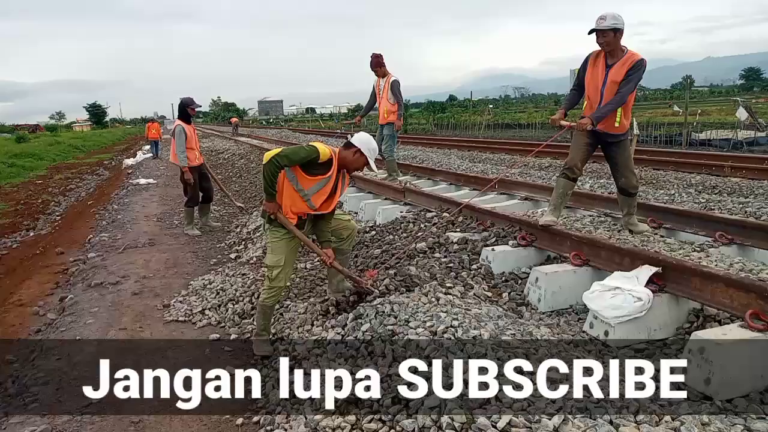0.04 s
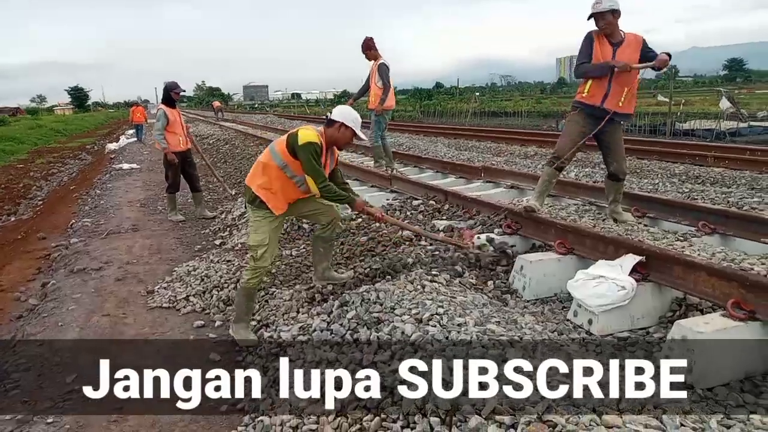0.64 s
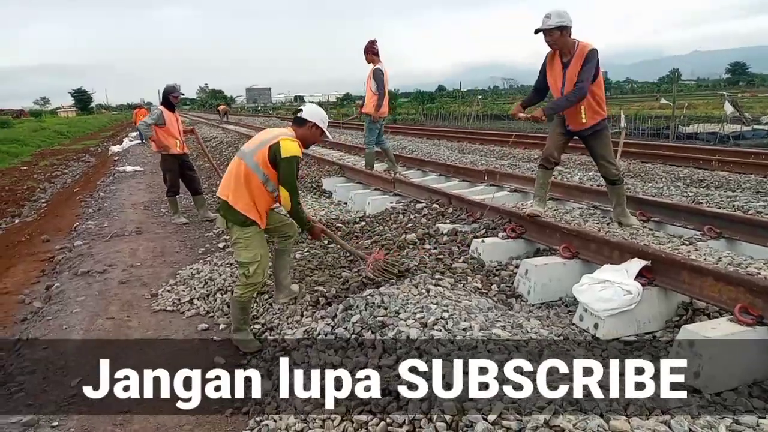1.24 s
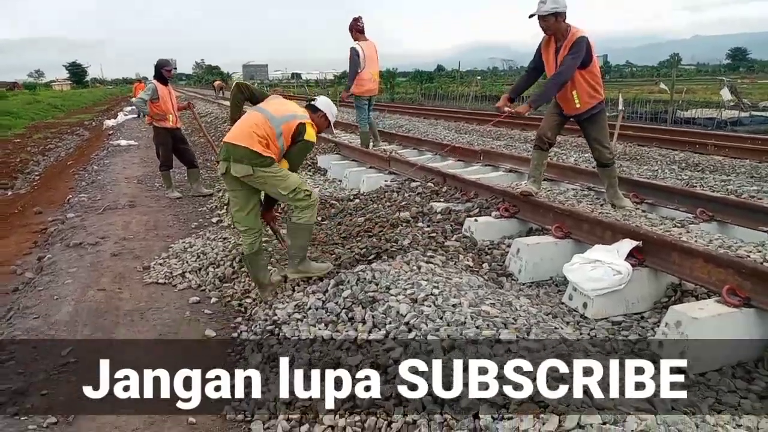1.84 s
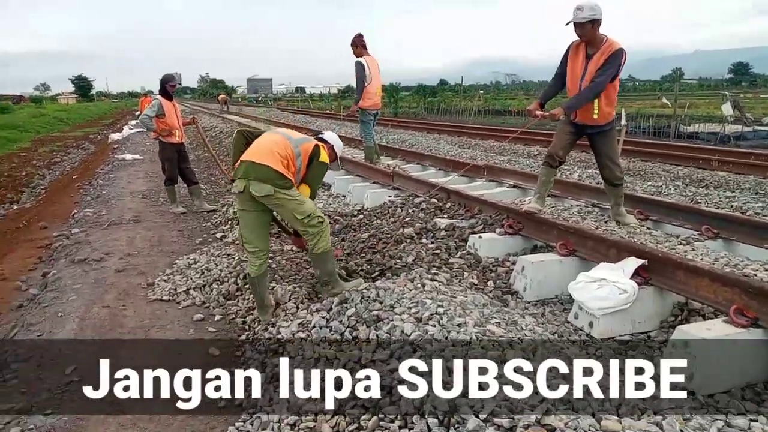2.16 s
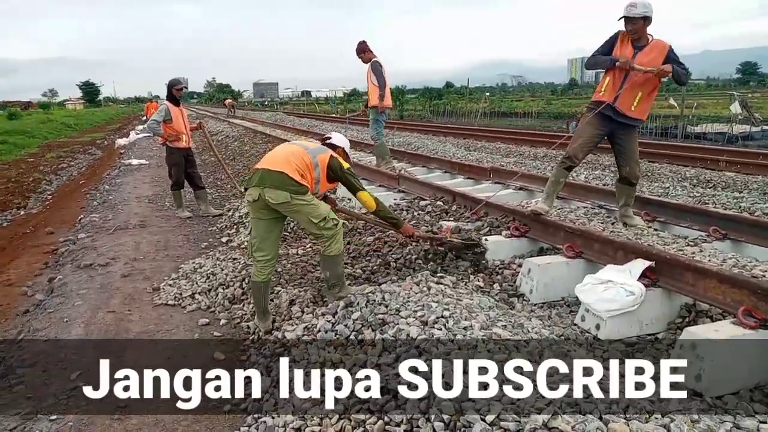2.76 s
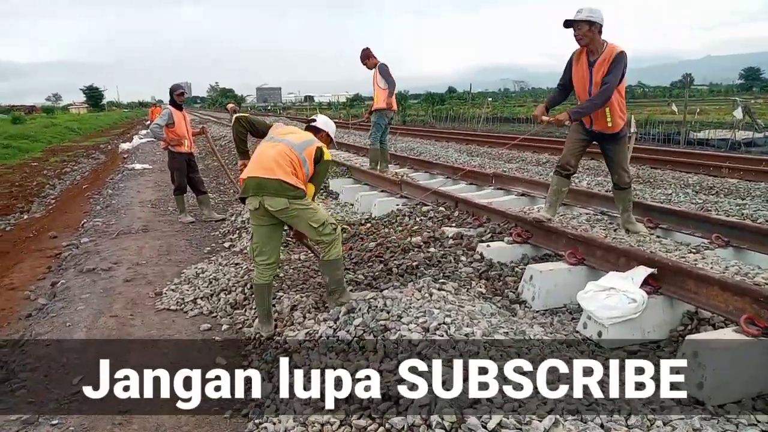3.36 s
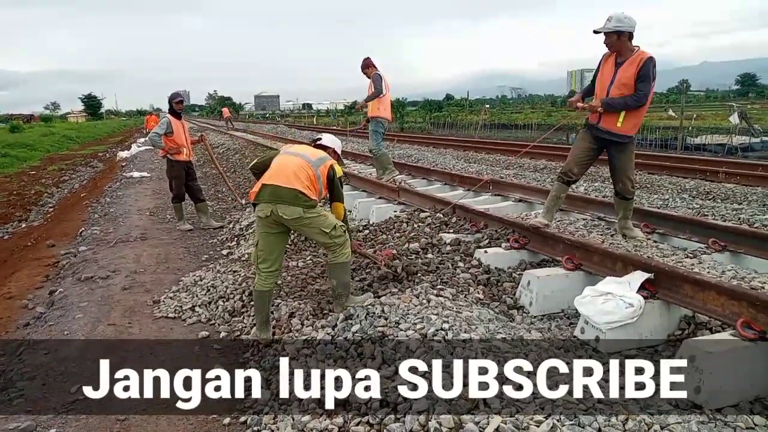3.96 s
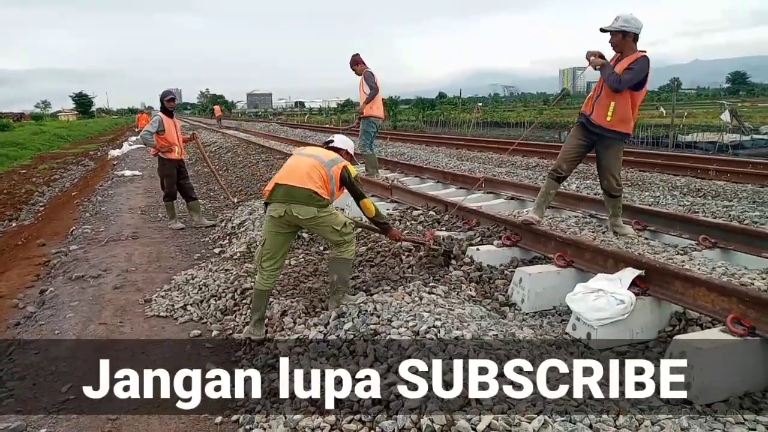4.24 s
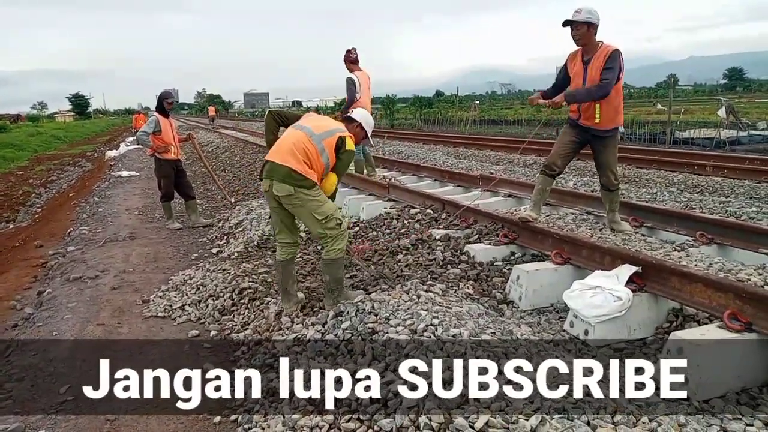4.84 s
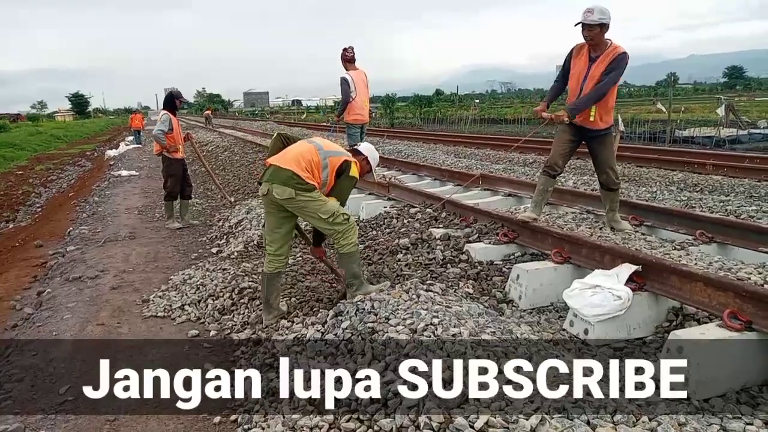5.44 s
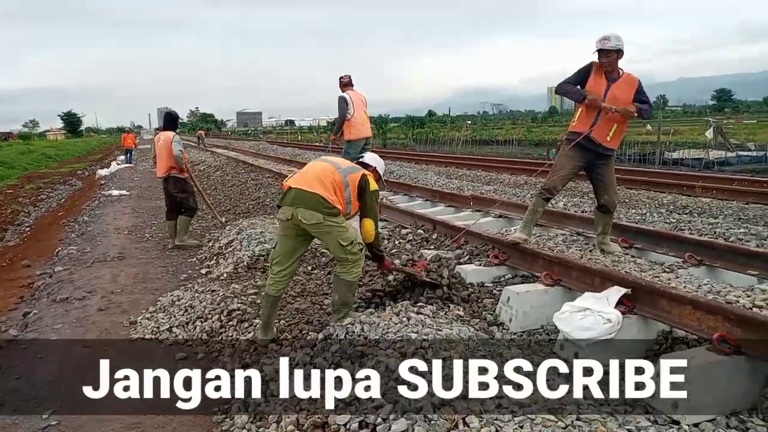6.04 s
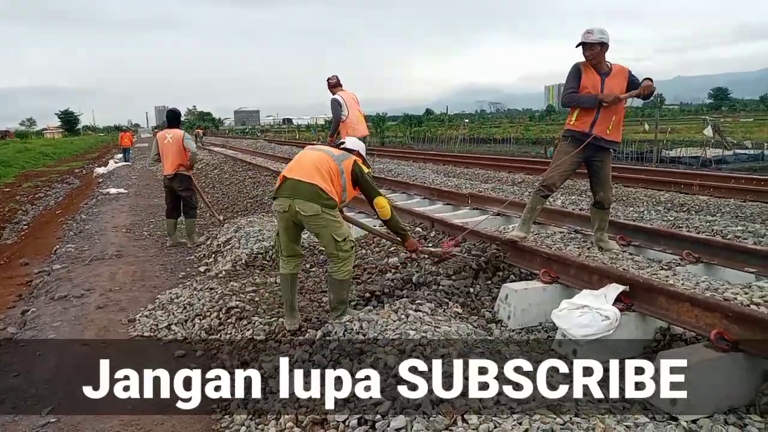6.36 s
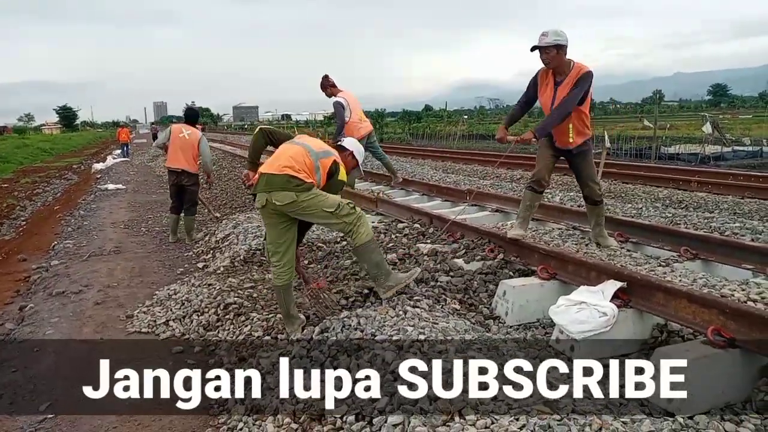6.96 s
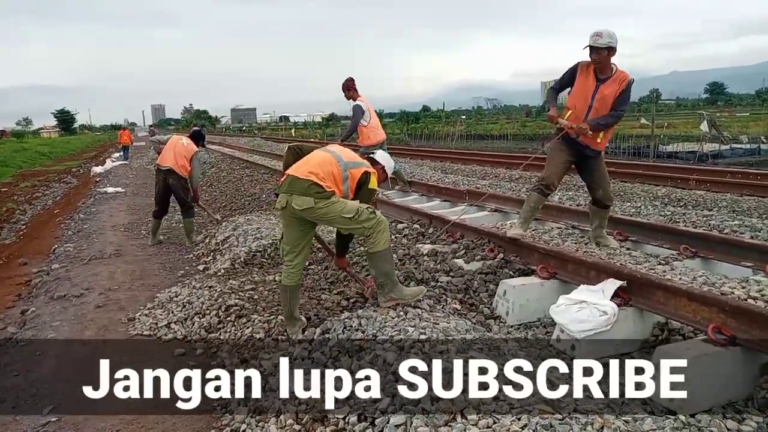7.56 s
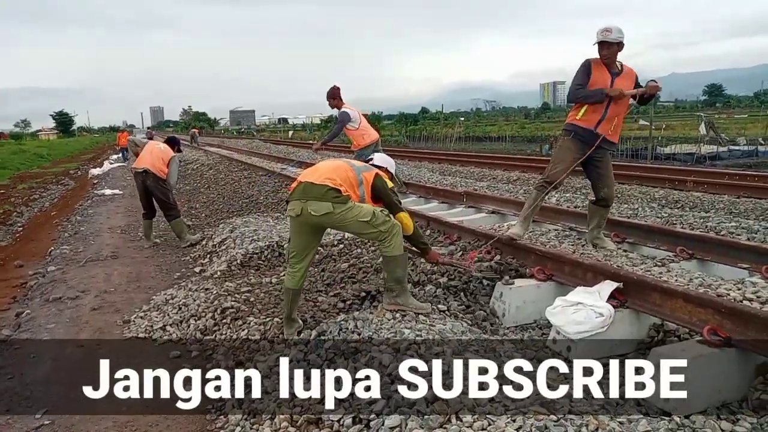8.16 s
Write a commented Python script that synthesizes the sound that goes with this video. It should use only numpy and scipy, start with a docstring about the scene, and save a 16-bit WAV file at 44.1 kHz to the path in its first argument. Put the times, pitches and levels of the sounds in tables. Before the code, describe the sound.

Gravel being shovelled outdoors, grinding and crunching in repeated scrapes, with small metallic pings and a faint wind rumble.

```python
"""Shovelling track ballast

A worker shovels crushed stone beside a railway track, in five long scraping strokes.
Stones grind and click together and ring the steel blade, more freely as it lifts and reaches out.
A low motor-like hum lasts for the first seconds; light wind and soft bumps reach two microphone ports."""
import sys
import numpy as np
from scipy import signal
from scipy.fft import rfft, irfft
from scipy.io import wavfile
from scipy.ndimage import uniform_filter1d, map_coordinates

SR = 44100
rng = np.random.default_rng(int(sys.argv[2]) if len(sys.argv) > 2 else 0)


def unload_wav(signal):
    """Save mono or channel-first audio to the path in sys.argv[1] as 16-bit WAV at rate SR, clipped to [-1, 1]."""
    wavfile.write(
        sys.argv[1],
        SR,
        np.round(np.clip(np.atleast_2d(signal).T, -1, 1) * 32767).astype(np.int16),
    )


N = 362061

# modes of the steel blade, before damping is applied: pitch_hz, level_db, t60_s
BLADE_MODES = [(1803, -5, .07), (2250, 0, .03), (2420, -2, .03), (3810, -7, .025), (4930, -2, .025),
               (5560, 2, .034), (6300, -1, .018), (10400, -12, .02)]


def scraping():
    """The blade pushes through the heap: stones crush and clink in jolts, and the steel rings along."""
    level_db, coarse_db, grit_db = stroke_levels()
    reach = blade_reach()
    crush = unit(collisions(count=14000, spread_db=-2.5, cycles=1.67, size=130) + rng.standard_normal(N))
    clinks = collisions(count=3000, spread_db=2.5, cycles=7, size=380)
    sliding = unit((crush + amp(-4) * clinks) * jolts(count=4000, spread_db=-1.4, t60_s=.036))
    # between strokes only a few pebbles still settle
    ticks = unit(crush * jolts(count=300, spread_db=2, t60_s=.025))
    calm = np.clip((-35 - level_db) / 14, 0, .65)
    contacts = (1 - calm) * sliding + calm * ticks
    stones = stone_colour(contacts)
    # the load chokes the blade; held out, it rings more
    choked_ring = blade_ring(np.arange(SR // 16) / SR, damping=3)
    steel = unit(signal.oaconvolve(contacts, choked_ring[None], axes=1)[:, :N])
    steel_share = .04 + .11 * reach ** 2
    body = np.sqrt(1 - steel_share) * unit(band(stones, 1300, 7200)) + np.sqrt(steel_share) * steel
    # stones slide off the outstretched blade: less weight, more rasp
    shed_db, rasp_db = 4.5, -6
    coarse = amp(coarse_db + 3 - shed_db * reach) * unit(band(stones, 354, 1190))
    skids = stone_colour(crush) * jolts(count=1500, spread_db=2, t60_s=.04)
    rasp = amp(rasp_db) * reach ** 2 * unit(band(skids, 4300, 6800))
    # fine grit comes in spurts, with the high notes of small chips
    spurts = jolts(count=300, spread_db=8, t60_s=.05)
    chips = collisions(count=700, spread_db=3, cycles=22, size=500, modes=2)
    grit = unit(band(stones, 8270, 14500) * (1 + .43 * spurts)) + .5 * unit(band(chips, 7900, 17300))
    return amp(level_db) * (body + coarse + rasp + amp(grit_db + 10) * unit(grit))


def stroke_levels():
    """Scrapes rise, swell or sag with the load and run out: overall dB, coarse and grit relative to it."""
    # long pushes and light drags of the blade, and a soft shuffle of boots on gravel:
    # start_s, end_s, attack_s, level_db, swell_db_per_s, release_t60_s, coarse_db, grit_db
    scrapes = [(0.37, .6, 0.039, -37, -8, .3, -38, -13.5), (0.463, 0.835, 0.14, -27, 2.5, 1, -13, -11.5),
               (0.96, 0.974, 0.007, -26.5, 3, 0.75, -7.5, -8.5),
               (1.09, 1.283, 0.074, -28, 9.5, 0.35, -14, -9.5), (1.348, 1.877, 0.021, -43, 0, 1, -6.5, -12),
               (1.878, 2.551, 0.059, -26, 5.5, 0.25, -12.5, -11),
               (2.504, 3.017, 0.065, -23, -12.5, 1, -14, -10),
               (3.618, 4.136, 0.079, -21, -6.5, 0.43, -15.5, -7),
               (4.182, 4.585, 0.019, -27, -9, 0.61, -11.5, -12.5),
               (4.695, 4.953, 0.017, -34, -19, 1, -5, -14), (5.108, 5.29, 0.038, -38.5, 9, .3, -9, -11),
               (5.296, 6.086, 0.0084, -26, 3.5, 0.84, -11, -11),
               (6.147, 6.497, 0.02, -27, 5, 0.44, -12.5, -11),
               (6.523, 6.659, 0.011, -33.5, -9, 0.082, -2, -11),
               (6.676, 6.832, 0.017, -42, -14, 0.24, -2, -21),
               (7.025, 7.07, 0.017, -28.5, 2, 0.13, -11, -14),
               (7.191, 7.357, 0.025, -25.5, 9.5, 0.4, -13, -11),
               (7.432, 7.715, .02, -27.5, 13.5, 0.3, -7.5, -11),
               (7.71, 8.21, 0.016, -22.5, -12, .4, -15.5, -10.5)]
    t, power = np.arange(N) / SR, np.zeros((3, N))
    for start_s, end_s, attack_s, level_db, swell, t60_s, coarse_db, grit_db in scrapes:
        age = t[:int((end_s - start_s + t60_s) * SR)]
        held = np.minimum(age, end_s - start_s)
        envelope = (1 - np.exp(-age / attack_s)) * amp(level_db + swell * held - 60 * (age - held) / t60_s)
        add(power, start_s, (amp([[0], [coarse_db], [grit_db]]) * envelope) ** 2)
    settling_db = -49  # pebbles that never quite come to rest
    power += (amp([[0], [-5], [-18]]) * amp(settling_db)) ** 2
    whole, coarse, grit = 10 * np.log10(power)
    return whole, coarse - whole, grit - whole


def blade_reach():
    """A slow push out and a quick pull back: 0 is at the feet, 1 at the rail."""
    # swings of the shovel: fully_out_s, pull_start_s
    swings = [(.7, 1.07), (3.0, 3.1), (4.5, 4.6), (6.3, 6.8), (8.1, 7.95)]
    push_s, pull_s, nearest = 1.0, .26, .21
    t = np.arange(N) / SR
    arcs = [np.minimum(1 + (t - out) / push_s, 1 - (t - back) / pull_s) for out, back in swings]
    return np.clip(np.max(arcs, axis=0), nearest, 1)


def collisions(count, spread_db, cycles, size=220, modes=3):
    """Stones collide at random: stereo grains of size samples, each mode decaying over so many cycles."""
    start = rng.integers(0, N, (count, 1))
    force = amp(spread_db * np.minimum(rng.exponential(size=(count, 1)), 3))
    skew_s = rng.normal(0, 1.5e-5, (count, 1))  # each grain has its own direction
    t = np.maximum(np.arange(size) / SR + np.array([skew_s, -skew_s]), 0).astype(np.float32)
    hz = np.exp(rng.uniform(np.log(600), np.log(17000), (modes, count, 1))).astype(np.float32)[:, None]
    age = hz * t / float(cycles)
    grains = (hz * np.sin(2 * np.pi * hz * t) * np.sqrt(age) * np.exp(-age)).sum(0)
    grains *= force * np.linspace(1, 0, size)
    positions = (start + np.arange(size)).ravel()
    return unit(np.array([np.bincount(positions, side.ravel(), N)[:N] for side in grains]))


def jolts(count, spread_db, t60_s):
    """Envelope of a heap giving way: slips that build over a few milliseconds and die quickly."""
    start = rng.integers(0, N, count)
    force = amp(spread_db * np.minimum(rng.exponential(size=count), 3))
    slips = uniform_filter1d(np.bincount(start, force ** 2, N), size=150)
    power = signal.lfilter([1], [1, -amp(-60 / (t60_s * SR)) ** 2], slips)
    return unit(np.sqrt(np.abs(power)))


def stone_colour(x):
    """Give white clicks the tone of stone on stone."""
    # spectrum of colliding stones: frequency_hz, gain_db
    gravel_eq = [(100, -76), (250, -4.5), (450, -15.5), (800, -9), (1200, -6.5), (2000, 0), (3500, -1),
                 (5900, -3.5), (8000, -1.5), (12000, -2.5), (16000, 5)]
    return equalise(x, gravel_eq)


def blade_ring(t, damping, struck_hz=None):
    """The steel's modes ring at new strengths with each blow; a point blow favours the one at struck_hz."""
    ring = 0
    for pitch_hz, level_db, t60_s in BLADE_MODES:
        miss_db = 0 if struck_hz in (None, pitch_hz) else 13
        envelope = amp(level_db + rng.normal(0, 1) - miss_db - 60 * damping * t / t60_s)
        ring += envelope * np.sin(2 * np.pi * pitch_hz * t + rng.uniform(0, 2 * np.pi))
    return ring


def knocks_and_ticks():
    """Stone knocks and high ticks: each is a brief chatter around its own short note."""
    # hits, from low stone knocks to thin, very high ticks: start_s, level_db, pitch_hz
    hits = [(0.4685, -23, 5330), (0.6298, -4.5, 11800), (.6474, -12, 6030), (.6914, -12.5, 2290),
            (.7367, -10.5, 4770), (0.7882, -16, 2430), (0.9758, -12, 4150), (1.1673, -13, 4210),
            (1.2186, -18.5, 2530), (1.694, -22.5, 2740), (1.8155, -23, 2180), (2.2876, -4, 10800),
            (2.9407, -11, 6000), (2.9726, -17.5, 2580), (3.0018, -10, 4900), (3.042, -5, 11900),
            (3.1254, -16.5, 2440), (3.1747, -16.5, 2390), (3.275, -26.5, 2320), (3.311, -27, 4640),
            (3.387, -28, 2980), (3.6356, -8, 3610), (3.6721, -7, 5300), (4.1619, -9, 4210),
            (4.446, -9.5, 5530), (4.474, -5, 11700), (4.5509, -12.5, 3860), (4.5819, -13.5, 2400),
            (4.596, -1.5, 11360), (4.6094, -15, 5700), (4.7326, -14, 2490), (5.1962, -21, 3620),
            (5.5917, -8.5, 6100), (6.11, -3, 14300), (6.1662, -11, 1970), (6.1764, -8.5, 2410),
            (6.1834, -8.5, 2260), (6.2493, -11, 2400), (6.2907, -16, 4860), (6.301, -3, 10400),
            (6.399, -13, 6660), (6.462, -10, 14900), (6.5026, -10, 6500), (6.6528, -17, 5160),
            (6.728, -34, 2100), (6.8099, -29, 3780), (6.884, -29.5, 1870), (7.2142, -11, 5020),
            (7.3507, -5, 15000), (7.9062, -9.5, 2220), (8.1609, -16, 2570)]
    track, t = np.zeros(N), np.arange(SR // 16) / SR
    for start_s, level_db, pitch_hz in hits:
        t60_s = .021 * (3000 / pitch_hz) ** .1  # higher hits die faster
        chatter = unit(band(rng.standard_normal(len(t)), pitch_hz / 2, pitch_hz * 2.5, order=1))
        note = np.sin(2 * np.pi * pitch_hz * t)
        hit = (chatter + .6 * note) * amp(-60 * t / t60_s) * (1 - np.exp(-t / .0007))
        add(track, start_s, amp(level_db + 2.5) * hit / np.abs(hit).max())
    return track


def blade_pings():
    """A stone chatters on free steel, which answers with a short, bright note."""
    # stones dropping on the lifted blade: start_s, level_db
    pings = [(2.819, -6), (2.894, -8), (3.0413, -16), (3.0744, -11.5), (4.6296, -6.5), (4.6837, -6),
             (4.912, -16), (6.203, -15), (6.235, -20), (6.424, -11)]
    track, t = np.zeros(N), np.arange(SR // 16) / SR
    for start_s, level_db in pings:
        detune = 1 + rng.normal(0, .012)  # the load shifts the pitch a little
        chatter = .5 * amp(-60 * t / .022) * unit(band(rng.standard_normal(len(t)), 1800, 7500, order=1))
        ring = blade_ring(t * detune, damping=1.3, struck_hz=5560)
        hit = (ring + chatter) * (1 - np.exp(-t / .001))
        add(track, start_s, amp(level_db - 4.5) * hit / np.abs(hit).max())
    return track


def blade_stabs():
    """The edge bites into the heap: a sudden crunch dies away while the blade clanks on its lowest mode."""
    # thrusts into the heap: start_s, level_db, crunch_t60_s
    stabs = [(0.7896, -5, 0.17), (1.7424, -19, 0.13), (3.448, -13, 0.16), (3.5762, -14.5, 0.32),
             (5.065, -14.5, 0.2), (5.1227, -9, 0.11), (7.0424, -24, 0.74), (7.212, -25, 0.27),
             (7.452, -7.5, 0.38)]
    force, clank, t = np.zeros(N), np.zeros(N), np.arange(SR // 2) / SR
    for start_s, level_db, t60_s in stabs:
        add(force, start_s, amp(level_db - 60 * t / t60_s) * (1 - np.exp(-t / .001)))
        add(clank, start_s, amp(level_db - 16) * blade_ring(t, damping=.5, struck_hz=BLADE_MODES[0][0]))
    contacts = collisions(count=6000, spread_db=3.5, cycles=2.9) + rng.standard_normal(N)
    crunch = unit(stone_colour(contacts))
    return amp(-4.5) * force * crunch + clank


def trackside(x):
    """The left port hears the blade later, by its reach; the ballast bed scatters a short, changing tail."""
    lag_s = 1.025e-3 - .18e-3 * blade_reach()
    left = map_coordinates(x[0], [np.arange(N) - SR * lag_s], order=5)
    direct = np.array([left, x[1]])
    scattered, t = np.zeros((2, N)), np.arange(SR // 8) / SR
    block, t60_s, predelay_s = SR // 10, .08, .002
    for first in range(0, N, block):
        tail = rng.standard_normal((2, len(t))) * amp(-60 * t / t60_s) * (t > predelay_s)
        tail /= np.linalg.norm(tail, axis=1, keepdims=True)
        add(scattered, first / SR, signal.fftconvolve(direct[:, first:first + block], tail, axes=1))
    return direct + amp(-7) * scattered


def hum():
    """A low, slightly unsteady drone, as of a far motor, that stops."""
    # the drone's fader moves: time_s, level_db
    fader = [(0.42, -64), (0.46, -50), (0.59, -47.5), (1.01, -34.5), (1.12, -43), (1.21, -35.5), (3.1, -42),
             (3.15, -33.5), (3.56, -34.5)]
    stop_s, fade_s = 3.63, .035
    pitch_hz = 93 + .23 * wobble(4.35)
    running = np.clip((stop_s - np.arange(N) / SR) / fade_s, 0, 1)
    return amp(automation(fader) + 2.5) * running * np.sin(2 * np.pi * np.cumsum(pitch_hz) / SR)


def wind():
    """Light wind rumbles, partly alike in both ports, over a faint open-air hiss."""
    # rise and fall of the breeze: time_s, level_db
    breeze = [(0.43, -100), (0.58, -52.5), (0.67, -53), (1.03, -46), (2.33, -46), (2.75, -51), (3.4, -42),
              (3.61, -48.5), (4.07, -43.5), (4.65, -48.5), (5.39, -42.5), (6.0, -48), (6.35, -51.5),
              (6.91, -42.5), (7.54, -45.5), (8.21, -50.5)]
    # spectrum of wind on the ports: frequency_hz, gain_db
    rumble_eq = [(25, -48), (40, -15), (65, 0), (100, 4.5), (160, -1.5), (260, -5), (400, -20.5),
                 (600, -22.5), (1500, -30.5)]
    air = rng.standard_normal(N) + 2.1 * rng.standard_normal((2, N))
    rumble = unit(equalise(air, rumble_eq))
    gusts = amp(2.3 * np.array([wobble(16), wobble(15)]))
    hiss = unit(band(rng.standard_normal((2, N)), 660, 1500, order=1))
    return amp(automation(breeze) + 7) * gusts * rumble + amp(-51) * hiss


def microphone_bumps():
    """Each bump is a few dull cycles, mostly in one port."""
    # soft bumps on the microphone: start_s, level_db, pitch_hz, left_over_right_db
    bumps = [(1.111, -17, 132, -21), (1.319, -25, 104, 21), (1.705, -17.5, 187, 16), (2.33, -23, 141, -31),
             (2.615, -27.5, 109, 14), (2.923, -22.5, 120, 0), (3.133, -16, 142, 22), (3.47, -23, 160, 33),
             (4.192, -25, 156, 25), (6.253, -26, 137.6, 32), (6.689, -27.5, 107, 6), (6.846, -37, 163, 22),
             (7.614, -25.5, 159, 19)]
    track, t = np.zeros((2, N)), np.arange(SR // 8) / SR
    envelope = (1 - np.exp(-t / .0049)) ** 2 * amp(-60 * t / .042)
    for start_s, level_db, pitch_hz, pan_db in bumps:
        noise = unit(band(rng.standard_normal(len(t)), 108.5, 2.12 * pitch_hz))
        thud = envelope * (np.sin(2 * np.pi * pitch_hz * t) + .62 * noise)
        pan = amp([[pan_db / 2], [-pan_db / 2]])
        add(track, start_s, amp(level_db) * pan / pan.mean() * thud / np.abs(thud).max())
    return track


def amp(db):
    """Decibels to gain."""
    return 10 ** (np.asarray(db) / 20)


def unit(x):
    """Scale to rms 1."""
    return x / np.sqrt(np.mean(x ** 2) + 1e-20)


def automation(points):
    """Join (time_s, value) points into one value per sample."""
    return np.interp(np.arange(N) / SR, *np.transpose(points))


def wobble(rate):
    """A smooth random curve, rate knots a second."""
    return map_coordinates(rng.standard_normal(int(N * rate / SR) + 4), [np.arange(N) * rate / SR])


def equalise(x, points, size=4096):
    """Minimum-phase EQ through (frequency_hz, gain_db) points on a log frequency axis."""
    points_hz, points_db = np.transpose(points)
    hz = np.fft.rfftfreq(size, 1 / SR)
    gain = amp(np.interp(np.log(hz + 1), np.log(points_hz + 1), points_db))
    cepstrum = irfft(np.log(np.maximum(gain, 1e-6)))
    cepstrum[1:size // 2] *= 2
    cepstrum[size // 2 + 1:] = 0
    kernel = irfft(np.exp(rfft(cepstrum)))
    return signal.oaconvolve(np.atleast_2d(x), kernel[None], axes=1)[:, :N]


def band(x, lo_hz, hi_hz, order=3):
    """The part of x between two frequencies."""
    return signal.sosfilt(signal.butter(order, [lo_hz, min(hi_hz, SR / 2 - 1)], 'band', fs=SR, output='sos'), x)


def add(track, start_s, sound):
    """Mix a sound into a track at start_s."""
    part = track[..., round(start_s * SR):][..., :sound.shape[-1]]
    part += sound[..., :part.shape[-1]]


def scene():
    """The shovel work in the open, over the low background."""
    work = scraping() + knocks_and_ticks() + blade_pings() + blade_stabs()
    return trackside(work) + hum() + wind() + microphone_bumps()


def record(dry):
    """Each port adds its own colour; the sound fades in after a short silence, its top cut off steeply."""
    # tone of the two microphone ports: frequency_hz, left_db, right_db
    port_eq = [(110, 4.5, -1.5), (816, -2.5, -5.5), (1074, -1, -10), (1790, 7.5, -5.5), (2680, 5.5, -6.5),
               (3440, -8.5, 0.5), (3327, 4, -5), (5470, 5.5, -2.5), (6230, 1, -3.5), (8190, -9.5, -11),
               (10700, -15, -8), (11140, -28.5, -6.5), (13800, -13, -23), (15160, -31.5, -9.5)]
    silence_s, fade_s, cutoff_hz = .402, .024, 15650
    heard = np.vstack([equalise(dry[k], np.array(port_eq)[:, [0, k + 1]]) for k in range(2)])
    heard *= np.clip((np.arange(N) / SR - silence_s) / fade_s, 0, 1)
    hz = np.fft.rfftfreq(N, 1 / SR)
    return irfft(rfft(heard) / np.sqrt(1 + (hz / cutoff_hz) ** 200), N)


dry = scene()
out = record(dry)
unload_wav(out)
```